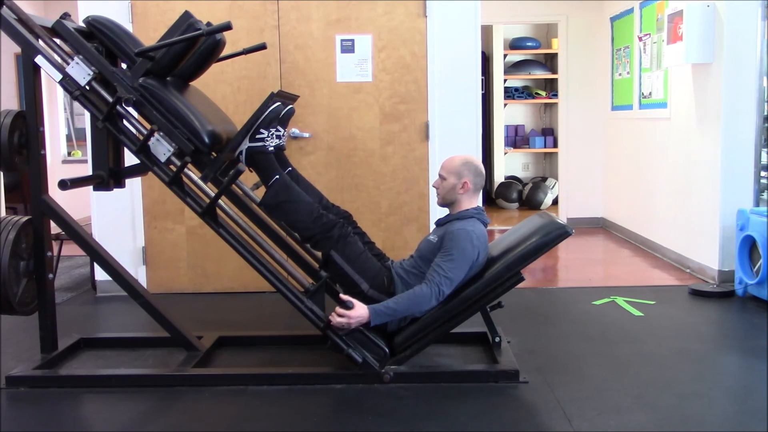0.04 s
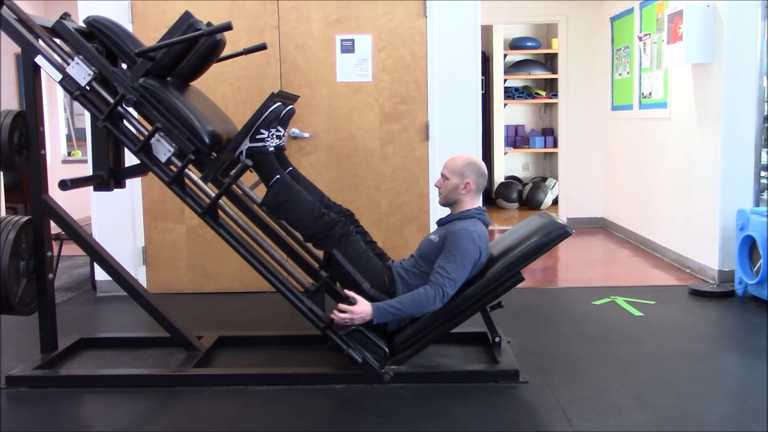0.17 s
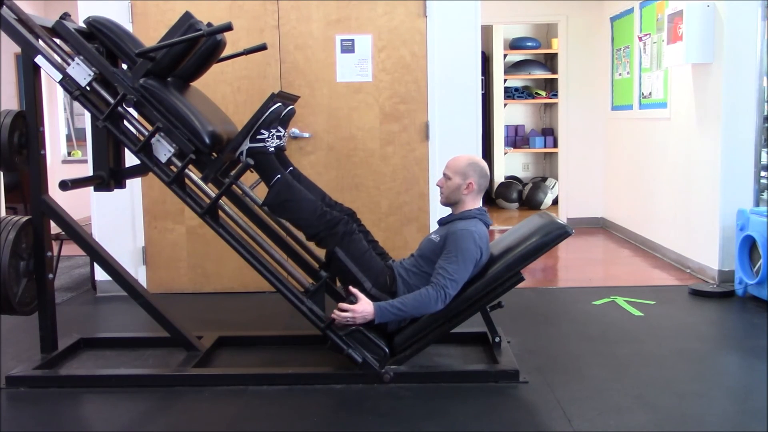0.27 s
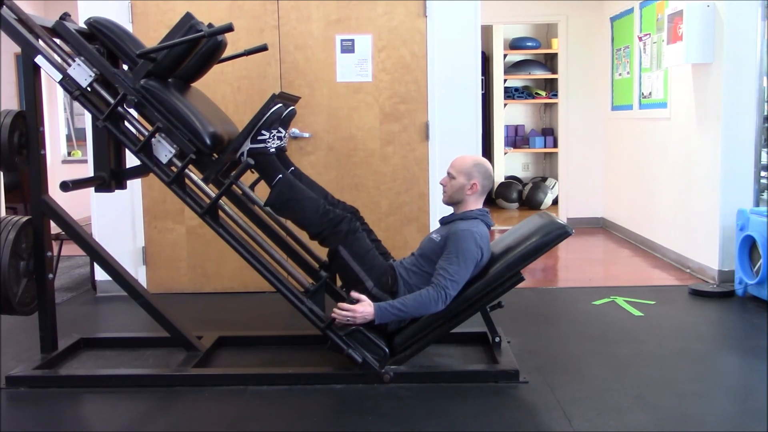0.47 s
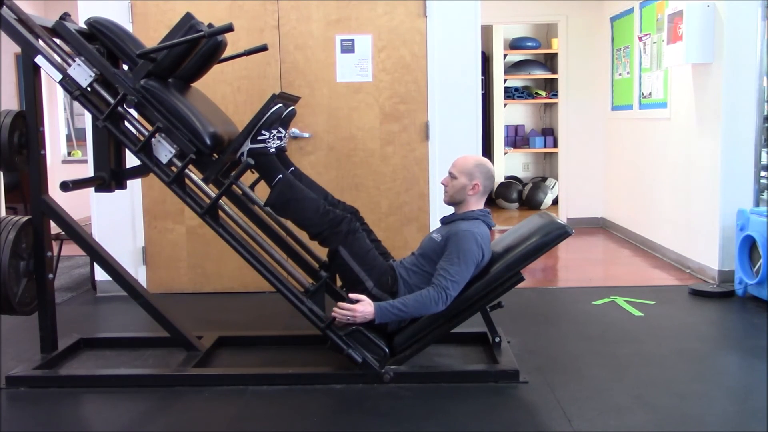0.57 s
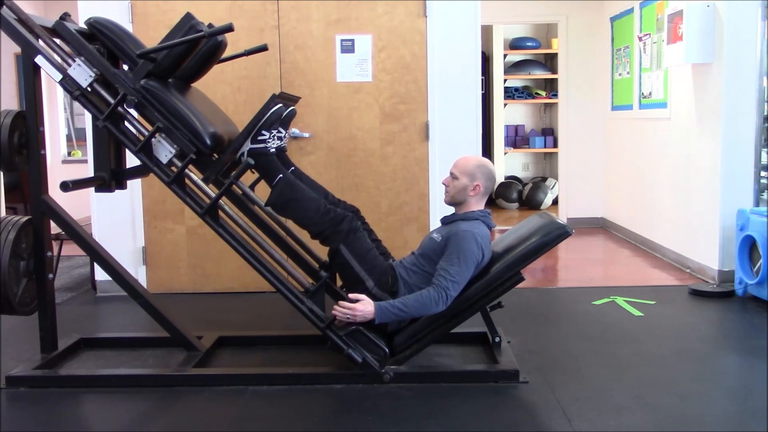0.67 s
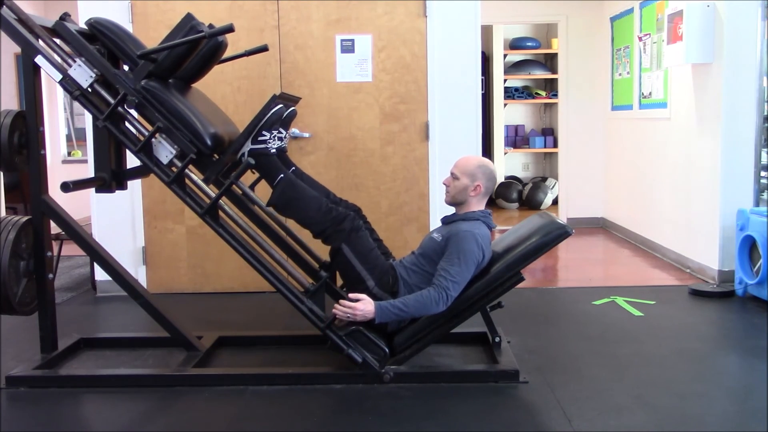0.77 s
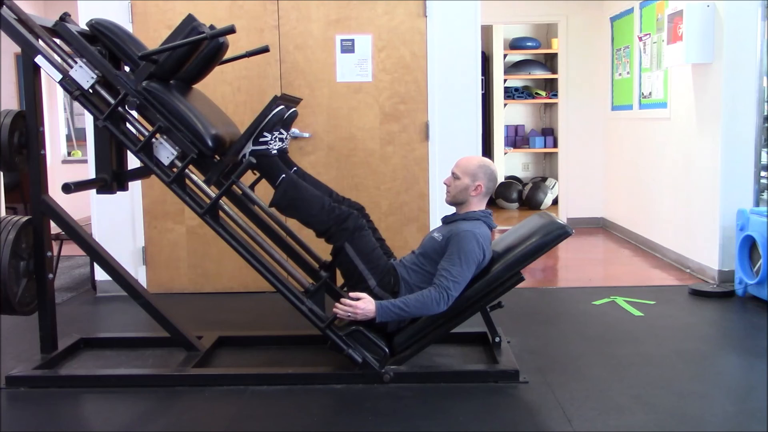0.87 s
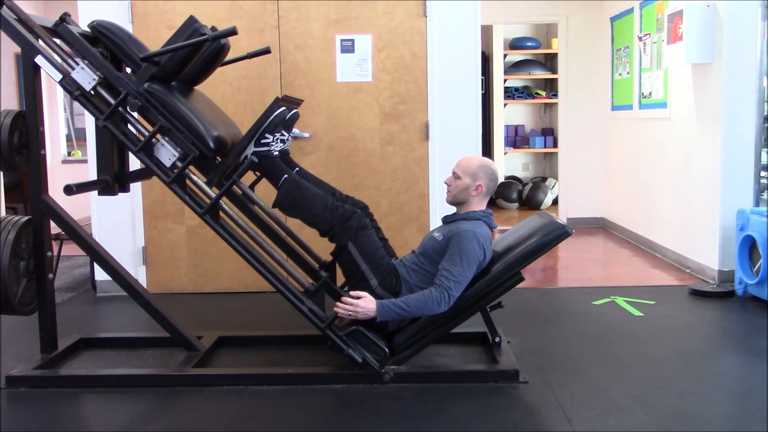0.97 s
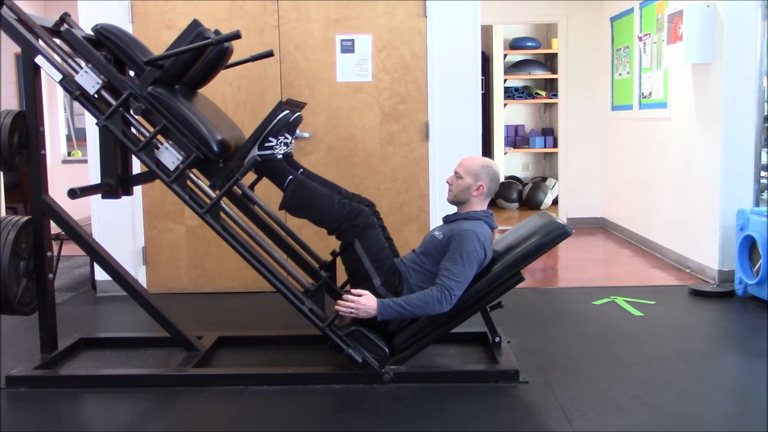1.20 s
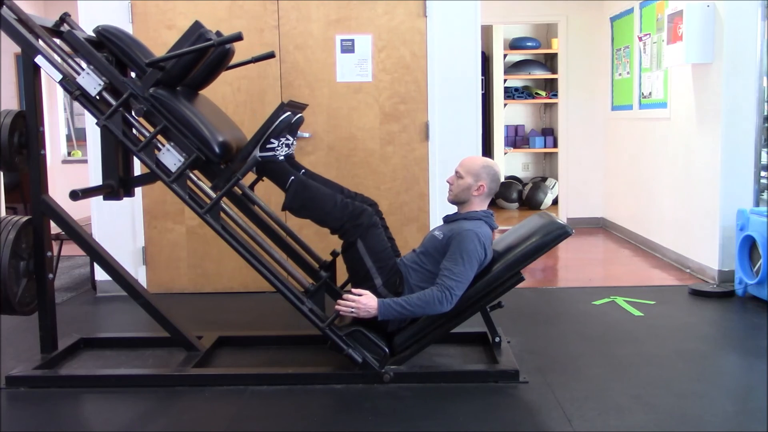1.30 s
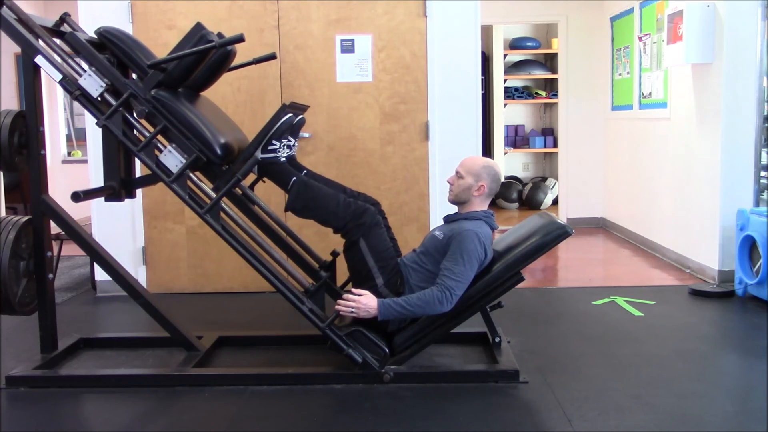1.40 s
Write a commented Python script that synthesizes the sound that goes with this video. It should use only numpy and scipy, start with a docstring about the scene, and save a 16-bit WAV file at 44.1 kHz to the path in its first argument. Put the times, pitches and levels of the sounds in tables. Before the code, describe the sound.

Metal clanks as two steel safety levers on a leg press swing aside, then its sled slides

```python
"""A leg press in a hard-walled gym, with ventilation humming behind it throughout as steady shaped noise.
After a tiny tick, two steel safety levers are swung aside, one after the other; each clanks and rebounds.
The freed sled then slides down its rails with gritty hiss, ticks, rumble and drone, and its loaded frame knocks.
Every blow rings clear steel modes and many fine ones, inside a dense noise wash of frame and room."""
import sys
import numpy as np
from scipy import signal
from scipy.io import wavfile
from scipy.ndimage import uniform_filter1d

SR = 44100
rng = np.random.default_rng(int(sys.argv[2]) if len(sys.argv) > 2 else 0)


def log_audio(samples):
    """Write samples as a 16-bit WAV file to the path given in sys.argv[1]."""
    # one column per channel
    frames = np.atleast_2d(samples).T
    # limit to full scale, then quantise
    limited = np.clip(frames, -1, 1)
    pcm = np.round(limited * 32767).astype(np.int16)
    wavfile.write(sys.argv[1], SR, pcm)


N = 63945
TIME = np.arange(N) / SR   # seconds

# Blows on the two levers and the sled. Each row: start in seconds, level in dB, brightness in dB per octave,
# clear ring in dB relative to the blow, first burst of the wash in dB relative to the blow.
FIRST_LEVER_BLOWS = [(.240, -20.5, 2, 1.5, 5), (.2455, -22.5, -3, -6, 0), (.301, -28.5, 2, -10, 2)]
SECOND_LEVER_BLOWS = [(.5032, -18, -0.3, -17, 2.1), (.5055, -15, 0.84, 3.5, 0.84),
                      (.5085, -20, 0.045, -15, 6.8), (.5235, -22.5, -4.54, -9, 5.1),
                      (.541, -24, -2, -37, 4.6), (.656, -22.5, -1.95, -1.5, 5.4)]
SLED_BLOWS = [(.820, -47.5, -4.5, -1, 5.1), (.933, -28.5, 1.5, -1, 3.2), (1.211, -41.5, -7, 0, 0.41),
              (1.267, -34.5, 0, 3, 6.2)]

# Clear steel modes of each part. Each row: frequency in Hz, level in dB within the ring, t60 in seconds.
FIRST_LEVER_MODES = [(660, -13, .18), (745, -13, .2), (1110, -11, .48), (1240, -13, .48), (1711, -11, .42),
                     (1798, -7, .27), (1895, -11, .5), (1926, -4, .35), (2191, -3.5, .44), (2277, -11, .5),
                     (2845, 0, .09), (3456, -19, .47), (4680, -14, .1), (4786, -23, .65), (6300, -24, .22),
                     (8538, -29, .28)]
SECOND_LEVER_MODES = [(804, -20, .75), (952, -20, .7), (1372, -12, .32), (1425, -8, .09), (1707, -11, .6),
                      (1765, -9, .3), (1843, -12, .55), (1917, -9, .52), (2042, -7, .22), (2195, -17, .8),
                      (2559, -24, 1), (2726, -8, .11), (2890, -3, .08), (3133, -17, .65), (4129, -20, .22),
                      (4797, -30, 1.1)]
SLED_MODES = [(307, -13, 1.1), (490, -16, 1), (570, -16, .8), (802, -15, .9), (951, -14, .6),
              (1297, -17, .6), (1703, -13, .65), (1835, -13, .7), (2146, -10, .55), (2720, -16, .5),
              (3461, -17, .8), (4795, -30, .8)]

# Spectral shape of each part's wash. Each row: frequency in Hz, relative density in dB per Hz.
FIRST_LEVER_WASH = [(30, -44), (80, -26.5), (170, -17.5), (290, -6), (430, -13), (720, -6), (930, -11.5),
                    (1130, 2), (1420, -15.5), (1950, 5), (2250, -0.5), (2550, -10.5), (2850, -4.5),
                    (4000, -13), (4800, -18), (5600, -24.5), (7500, -29), (11000, -51), (13000, -59),
                    (15000, -70)]
SECOND_LEVER_WASH = [(30, -38), (60, -30), (120, -14), (200, -14.5), (300, -3.5), (450, -7.5), (700, -6),
                     (1100, -2), (1550, -2.5), (1900, 2), (2450, -4.5), (2900, -0.5), (3600, -14),
                     (4200, -11.5), (5000, -18.5), (7500, -24.5), (11000, -42), (13000, -51), (15000, -60)]
SLED_WASH = [(60, -39), (170, -0.5), (290, -6), (420, 0), (700, 1.5), (1000, 0), (1300, -4.5), (1850, 2),
             (2400, -2.5), (2800, -4.5), (3500, -15), (4200, -26), (7000, -41), (15000, -59)]

# Decay of the wash, before a part's sustain scales it. Each row: frequency in Hz, t60 in seconds.
WASH_T60 = [(100, 0.61), (300, 1.41), (700, 0.9), (1800, 0.81), (3000, 0.78), (5000, 0.74), (8000, 0.28),
            (13000, .3)]

# Levels of the rail hiss and frame rumble over time. Each row: time in seconds, level in dB.
HISS_LEVEL = [(0, -73), (.78, -69), (.86, -58), (.94, -52.5), (1.15, -53), (1.3, -53.5), (1.45, -51.5)]
RUMBLE_LEVEL = [(0, -62), (.7, -54), (.95, -54), (1.22, -54.5), (1.35, -43), (1.45, -49)]

# Small ticks: one before the levers, the rest as the sled slides. Each row: start in seconds, level in dB.
TICKS = [(.185, -57.5), (.922, -50), (1.058, -47.5), (1.174, -52), (1.216, -50.5), (1.299, -52),
         (1.344, -47)]

# Spectral shapes of hiss, rumble, ticks and ventilation. Each row: frequency in Hz, relative density in dB per Hz.
HISS_COLOUR = [(500, -14), (1800, 10.5), (4200, -0.5), (6500, 1), (10000, -5), (13000, -20), (15500, -22)]
RUMBLE_COLOUR = [(50, -27), (120, 0), (170, -2), (240, -4), (340, 3), (600, -4.5), (1200, -19), (2000, -18),
                 (4000, -24.5), (9000, -71)]
TICK_COLOUR = [(1000, -8), (4000, -2), (9500, 0.5), (15000, -13)]
VENTILATION_COLOUR = [(25, -29), (50, -35), (76, -17.5), (97, 3), (150, -16), (260, -4.5), (450, -9.5),
                      (900, -18), (2000, -30), (5000, -34), (11000, -41.5), (15000, -56)]

# Frame resonances that drone under the sled. Each row: frequency in Hz, width in Hz, dB relative to the rumble.
DRONES = [(170.3, 9.5, -5.5), (343.8, 4.2, -4.5)]

# Stereo width of the noise. Each row: frequency in Hz, side level in dB relative to the mid.
SIDE_LEVEL = [(30, -13), (60, -29), (250, -36), (500, -30), (1000, -23), (2000, -19), (4000, -16),
              (5500, -21), (7500, -29)]

# Quarter-octave noise bands, in Hz.
EDGES = 25 * 2 ** (np.arange(39) / 4)
CENTRES = np.sqrt(EDGES[1:] * EDGES[:-1])

# Brightness tilts a blow around the pivot and stops growing outside this range.
PIVOT_HZ, TILT_FROM_HZ, TILT_TO_HZ = 1940, 460, 6900
# The bright instant of contact, then the first burst and the long tail.
CRACK_DB, CRACK_T60_S, CRACK_DB_PER_OCTAVE = 3, 0.028, 1.5
BURST_T60_S, TAIL_DB = 0.11, -4.5
# Lows swell later, and the room takes a moment to fill (time constants).
ATTACK_S, ATTACK_CYCLES, ROOM_BUILD_S = 0.00014, 1.7, 0.0046
# Factor on the wash's t60 at the pivot: none in the bass, squared from an octave above the pivot.
FIRST_LEVER_SUSTAIN, SECOND_LEVER_SUSTAIN, SLED_SUSTAIN = 0.9, 1.03, 0.99
MODE_BUILD_S = 0.0005   # time constant of a mode's onset
# Fine modes: level relative to the blow, spread of their strengths, and their range.
FINE_DB, FINE_SPREAD_DB, FINE_RANGE_HZ = -6, 3, (800, 9000)
GRAIN_DB, GRAIN_S = 1.5, .004   # grit of the hiss: rms depth and smoothing length
TICK_S = 0.0062   # time constant of a tick's decay
VENTILATION_DB = -53
PAN_DB = .2   # left up and right down by this much
CUTOFF_HZ = 15450


def struck(blows, modes, colour, sustain):
    """One steel part: its clear and fine ring inside its wash."""
    s, db, _, ring_db, _ = np.transpose(blows)
    clear = ring(s, db + ring_db, modes)
    fine = fine_ring(blows, colour)
    return clear + fine + wash(blows, colour, sustain)


def ring(s, db, modes):
    """Each blow sets the decaying steel modes ringing anew, in random phase."""
    out = np.zeros(N)
    build = np.exp(-1 / (MODE_BUILD_S * SR))
    for hz, mode_db, t60 in modes:
        kicks = np.full(N, 1e-18, complex)   # a tiny floor keeps the filter fast
        phase = np.exp(2j * np.pi * rng.random(len(s)))
        kicks[(s * SR).astype(int)] = from_db(db + mode_db) * phase
        turn = np.exp(2j * np.pi * hz / SR)
        fade = dying(1 / SR, t60)
        # the slow pole rings, the fast one rounds the onset
        poles = np.poly([turn * fade, turn * build])
        out += signal.lfilter([1 - build], poles, kicks).real
    return out


def fine_ring(blows, colour, count=220):
    """Many weak, closely spaced steel modes make the tail shimmer."""
    hz = np.geomspace(*FINE_RANGE_HZ, count) * np.exp(rng.normal(0, 1 / count, count))
    mode_db = at_hz(colour, hz) + rng.normal(0, FINE_SPREAD_DB, count)
    strength = from_db(mode_db) * np.sqrt(hz)   # modes lie further apart higher up, so each carries more
    strength_db = 20 * np.log10(strength / np.linalg.norm(strength))
    modes = np.transpose([hz, strength_db, at_hz(WASH_T60, hz)])
    s, db = np.transpose(blows)[:2]
    return ring(s, db + FINE_DB, modes)


def wash(blows, colour, sustain):
    """Dense frame modes and room echoes as noise: a crack, a short burst, then a tail; lows swell later."""
    hz = CENTRES[:, None]
    power = np.zeros((len(CENTRES), N))
    octaves = np.log2(np.clip(hz, TILT_FROM_HZ, TILT_TO_HZ) / PIVOT_HZ)
    t60 = at_hz(WASH_T60, hz) * sustain ** np.clip(1 + octaves, 0, 2)
    room_fill = 1 - np.exp(-TIME / ROOM_BUILD_S)
    tail = from_db(TAIL_DB) * dying(TIME, t60) * room_fill
    crack = from_db(CRACK_DB + CRACK_DB_PER_OCTAVE * octaves) * dying(TIME, CRACK_T60_S)
    attack = 1 - np.exp(-TIME / (ATTACK_S + ATTACK_CYCLES / hz))
    for s, db, tilt_db, _, burst_db in blows:
        start = int(s * SR)
        burst = from_db(burst_db) * dying(TIME, BURST_T60_S)
        gains = band_gains(colour)[:, None] * from_db(db + tilt_db * octaves)
        blow_power = (gains * attack) ** 2 * (crack ** 2 + burst ** 2 + tail ** 2)
        power[:, start:] += blow_power[:, :N - start]
    return np.einsum("bn,bcn->cn", np.sqrt(power), noise_bands())


def sled_and_ticks():
    """The carriage hisses grittily on the rails, the frame rumbles and drones; short noise bursts tick."""
    bands = noise_bands()
    grit = uniform_filter1d(rng.standard_normal(N), max(2, int(GRAIN_S * SR)))
    hiss_db = np.interp(TIME, *np.transpose(HISS_LEVEL)) + GRAIN_DB * grit / grit.std()
    hiss = from_db(hiss_db) * coloured(bands, HISS_COLOUR)

    drones = sum(from_db(db) * drone(hz, width) for hz, width, db in DRONES)
    frame = coloured(bands, RUMBLE_COLOUR) + drones
    rumble = from_db(np.interp(TIME, *np.transpose(RUMBLE_LEVEL))) * frame

    tick_envelope = sum(from_db(db) * np.exp(-np.maximum(TIME - s, 0) / TICK_S) * (TIME > s)
                        for s, db in TICKS)
    # time-reversed noise sets the ticks apart from the hiss
    ticks = tick_envelope * coloured(bands[..., ::-1], TICK_COLOUR)
    return hiss + rumble + ticks


def drone(hz, width):
    """Noise through one narrow resonance, rms 1."""
    r = np.exp(-np.pi * width / SR)
    resonance = [1, -2 * r * np.cos(2 * np.pi * hz / SR), r * r]
    x = signal.lfilter([1, 0, -1], resonance, rng.standard_normal(N))
    return x / x.std()


def ventilation():
    """Low steady room noise."""
    return from_db(VENTILATION_DB) * coloured(noise_bands(), VENTILATION_COLOUR)


def coloured(bands, colour):
    """Steady noise with a given spectrum."""
    return np.tensordot(band_gains(colour), bands, 1)


def band_gains(colour):
    """Gain of each band for a spectrum; total power 1."""
    gains = from_db(at_hz(colour, CENTRES)) * np.sqrt(CENTRES)   # bands widen with frequency
    return gains / np.linalg.norm(gains)


def noise_bands():
    """Quarter-octave bands of nearly mono noise, mid rms 1 each: bands x channels x N."""
    white = rng.standard_normal((2, 2, N + SR // 4))   # the extra quarter second lets the filters settle
    bands = []
    for k, hz in enumerate(CENTRES):
        band_pass = signal.butter(2, EDGES[k:k + 2], "band", fs=SR, output="sos")
        # neighbouring bands draw on different noise
        mid, side = signal.sosfilt(band_pass, white[k % 2])[:, -N:]
        width = from_db(at_hz(SIDE_LEVEL, hz)) * side * np.array([[1], [-1]])
        bands.append((mid + width) / mid.std())
    return np.array(bands)


def at_hz(points, hz):
    """Read a table on a log-frequency axis."""
    table_hz, values = np.transpose(points)
    return np.interp(np.log(hz), np.log(table_hz), values)


def dying(age, t60):
    """Exponential decay, 60 dB down after t60."""
    return np.exp(-np.log(1000) * age / t60)


def from_db(db):
    """Decibels to gain."""
    return 10 ** (np.asarray(db) / 20)


def scene():
    """Blows on two levers and the sled, slightly to the left, over the slide, ticks and room noise."""
    steel = (struck(FIRST_LEVER_BLOWS, FIRST_LEVER_MODES, FIRST_LEVER_WASH, FIRST_LEVER_SUSTAIN)
             + struck(SECOND_LEVER_BLOWS, SECOND_LEVER_MODES, SECOND_LEVER_WASH, SECOND_LEVER_SUSTAIN)
             + struck(SLED_BLOWS, SLED_MODES, SLED_WASH, SLED_SUSTAIN))
    return steel * from_db([[PAN_DB], [-PAN_DB]]) + sled_and_ticks() + ventilation()


def record(dry):
    """The highest peaks are clipped just under full scale, then the top is cut steeply."""
    low_pass = signal.ellip(10, .1, 80, CUTOFF_HZ, fs=SR, output="sos")
    return signal.sosfilt(low_pass, np.clip(dry, -.95, .95))


dry = scene()
out = record(dry)
log_audio(out)
```